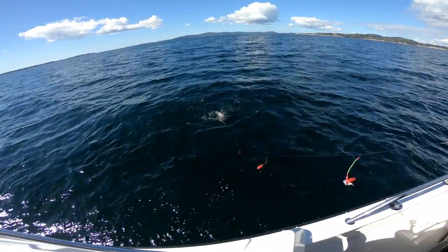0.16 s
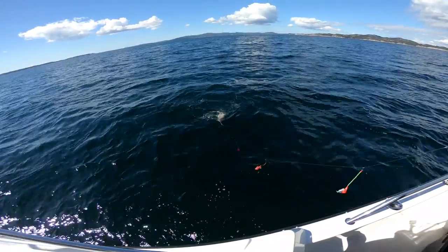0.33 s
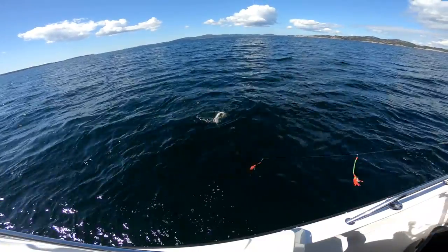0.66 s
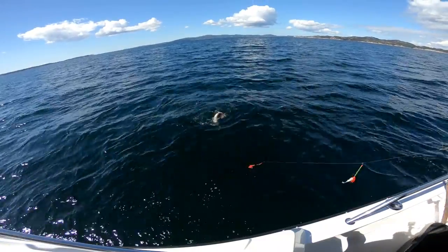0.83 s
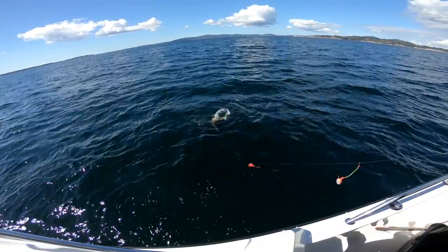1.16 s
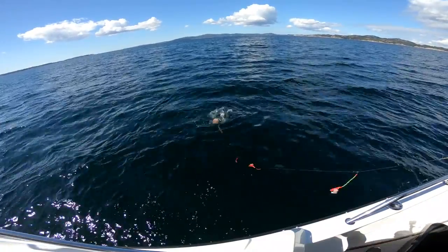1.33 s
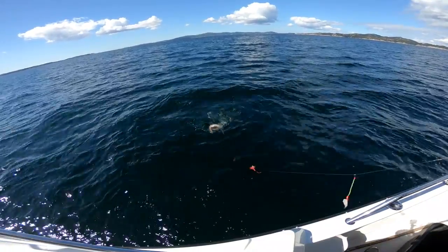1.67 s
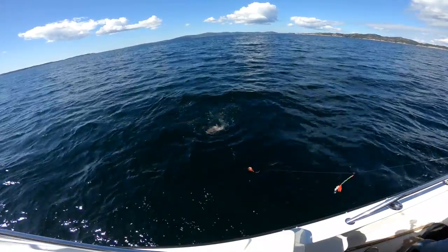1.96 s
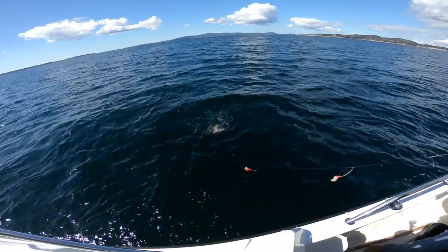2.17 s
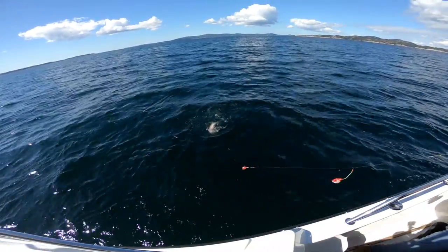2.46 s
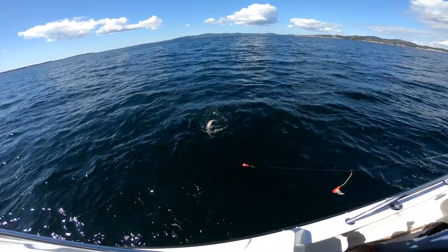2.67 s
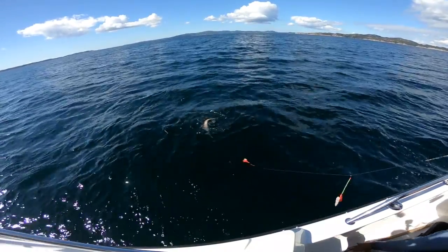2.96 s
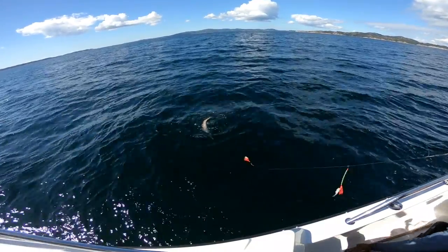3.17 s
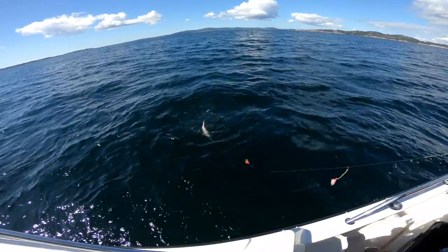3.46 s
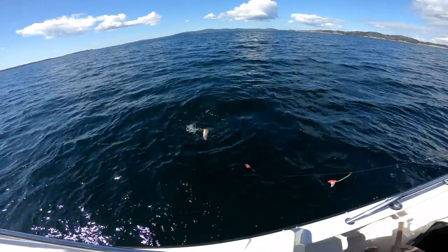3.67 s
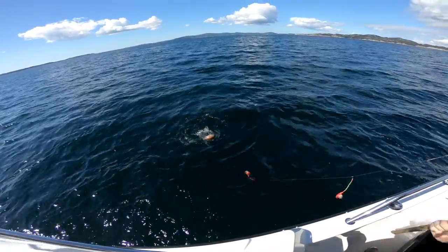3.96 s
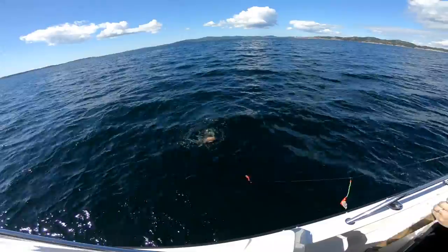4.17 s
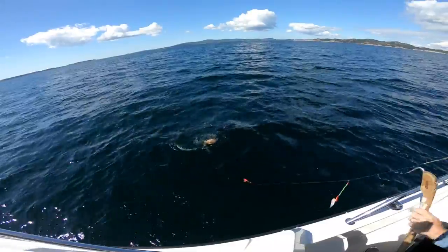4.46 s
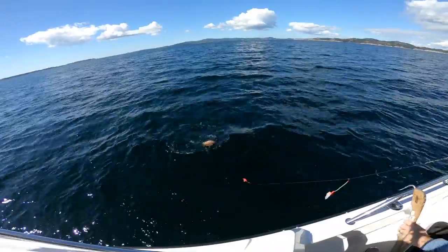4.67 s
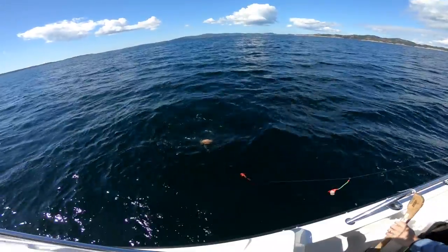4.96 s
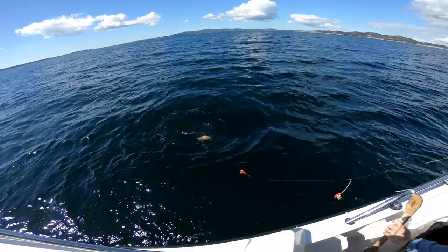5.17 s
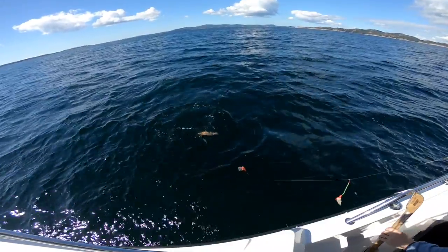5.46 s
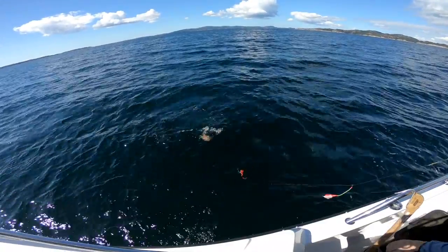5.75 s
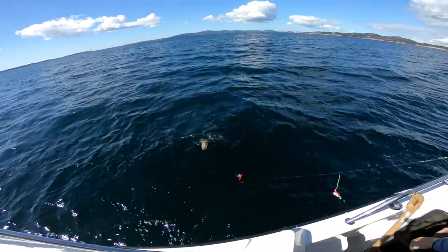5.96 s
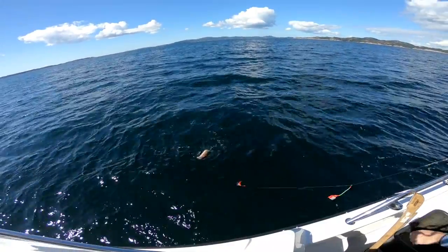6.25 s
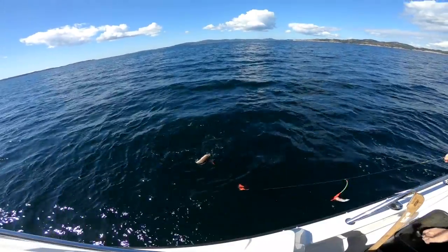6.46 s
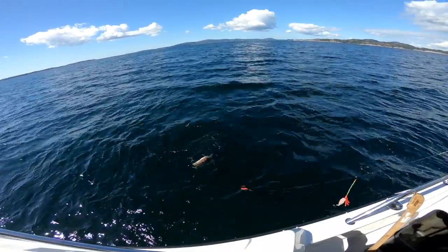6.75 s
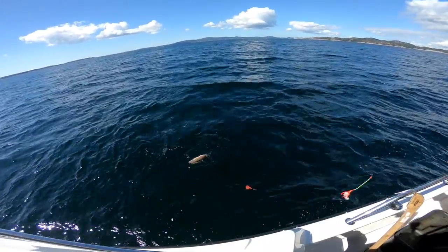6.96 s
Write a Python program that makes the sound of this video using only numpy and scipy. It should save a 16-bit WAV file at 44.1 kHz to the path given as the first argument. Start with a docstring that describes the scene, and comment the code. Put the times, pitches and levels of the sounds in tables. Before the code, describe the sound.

Close beside a small boat, water smacks the hull hard, calms to gurgle and droplets, then slaps again with a brief metallic rattle.

```python
"""At the side of a small open boat, a camera microphone close by hears small waves slap the hull.
Slaps crowd the first 1.8 s: noise bursts that crack and spray, with booms of ringing hull modes
and an early rattle of a metal fitting. A lull follows: rising-sine gurgle and trickle, two swishes,
single drops, a few slaps. From 4.7 s more slaps shake the fitting; gurgle and a last slap close.
Throughout lie a steady noise hush and deep noise, slow air pressure swaying the microphone."""
import sys
import numpy as np
from scipy import signal
from scipy.fft import rfft, irfft
from scipy.io import wavfile
from scipy.ndimage import uniform_filter1d

SR = 44100
rng = np.random.default_rng(int(sys.argv[2]) if len(sys.argv) > 2 else 0)


def unload_wav(signal):
    """Save mono or channel-first audio to the path in sys.argv[1] as 16-bit WAV at rate SR, clipped to [-1, 1]."""
    wavfile.write(
        sys.argv[1],
        SR,
        np.round(np.clip(np.atleast_2d(signal).T, -1, 1) * 32767).astype(np.int16),
    )


def amplitude_ratio(level_db):
    """Convert a level in decibels to the matching linear amplitude (field) ratio."""
    exponent = np.asarray(level_db, float) / 20
    return 10 ** exponent


N = 313551
T = np.arange(N) / SR

# Slaps and splashes at the hull; the slap colour is built from the three levels.
# Each row: time in seconds, crack level in dB, body level in dB, spray level in dB, length factor.
SLAP_EVENTS = [(0.0705, -21, -8.5, -20, 0.44), (0.3328, -28, -5.5, -29, 2.5),
               (0.3369, 3.5, -22, -10.5, 1.47), (0.3653, -69, -11.5, -8.5, 2.5),
               (0.468, -28, -8, -38, 1.05), (0.6997, -14, -16, -46, 0.84), (0.74, -32, 4.5, -39, 0.77),
               (0.7605, -8.5, -2, -41, 0.58), (0.825, -57, -1.5, -41, 0.89), (0.9306, -18, -9.5, -43, 0.23),
               (0.9894, -20, 0, -24, 0.48), (0.995, 7, -0.5, 2, 0.66), (1.0188, -10.5, -7.5, -15.5, 1.37),
               (1.249, -3, -19, -20, 0.78), (1.279, 3.5, 6, -15, 0.98), (1.4438, 7, -34, -51, 0.62),
               (1.467, -13.5, -8, -32, 0.69), (1.502, -1, -4, -40, 1.28), (1.573, 0.5, -5.5, -23, 1.2),
               (1.6117, 0, -38, -39, 0.64), (1.645, -5, -1.5, -72, 0.82), (1.6934, -14, -7, -54, 0.55),
               (1.7404, -80, -13, -48, 0.85), (2.371, -64, -20, -55, 0.86), (2.418, -60, -22, -57, 1.5),
               (2.4866, -24.5, -43, -37, 0.72), (2.938, -37, -27, -39, 3), (3.0893, 5, -50, -19, 1.66),
               (3.105, -8, -12.5, -49, 1.32), (3.1527, -17, -31, -68, 1.37), (3.545, -2, 3.5, -72, 0.67),
               (3.581, -22, -32, -31, 2.8), (4.7283, -1.5, -5, -4.5, 1.08), (4.9067, -30, -29, -39, 1.1),
               (5.015, -2, -10, -10.5, 1.46), (5.3284, -10, -21.5, -29, 0.99),
               (5.5544, -12, -26, -22.5, 0.79), (6.905, -26, -13.5, -33, 2)]
# Fade of a slap of length factor 1. Each row: frequency in Hz, time to fall 60 dB in seconds.
SLAP_FADE = [(200, 0.29), (500, 0.12), (1200, 0.1), (3000, 0.054), (8000, 0.053), (14000, 0.0083)]
# Onset of a slap. Each row: frequency in Hz, rise time constant in seconds.
SLAP_ONSET = [(200, 0.016), (1000, 0.00058), (8000, 0.00031)]
# Thrown water falls back after each slap: a fainter tail, this many times longer.
FALLBACK_DB, FALLBACK_SLOWER = -26, 3.23

# Blows that make the hollow hull boom.
# Each row: start in seconds, level in dB, level of the deepest mode within the blow in dB.
HULL_BLOWS = [(0.246, -22, -9), (0.347, -2.5, 3), (0.749, -6.5, 14), (1.003, -7, -22), (1.288, -11, -3),
              (1.508, -10.5, -4), (1.649, -15.5, -7), (2.417, -23.5, 6), (2.96, -23, 0), (3.101, -21.5, 5),
              (3.547, -8, 3), (3.809, -26, 14.5), (4.733, -8, 4), (4.907, -20.5, -10), (5.021, -11.5, -9),
              (5.063, -13.5, -10), (5.338, -14, -1), (6.618, -27, 1), (7.027, -14, 5)]
# Low modes of the hull. Each row: frequency in Hz, level in dB, time to fall 60 dB in seconds.
HULL_MODES = [(59.3, -8.5, 0.43), (68.6, -12, 0.49), (107.25, 1, 0.27), (119.4, 2, 0.32), (147.4, 0, 0.22),
              (287, 5, 0.069)]
# Water working at the hull from below, before its two parts are weighted.
# Each row: time in seconds, level in dB.
SLOSH_LEVEL = [(0.0, -34.5), (0.87, -23), (1.68, -33.5), (1.86, -47.5), (4.79, -43.5), (4.95, -28.5),
               (6.06, -43), (6.95, -32.5), (7.11, -24)]

# Blows that shake the metal fitting. Each row: start in seconds, level in dB.
FITTING_BLOWS = [(0.3403, -14), (0.369, -15), (0.3958, -20), (2.211, -34), (4.73, -9.5), (5.016, -11),
                 (5.3252, -35)]
# Modes of the fitting. Each row: frequency in Hz, level in dB, time to fall 60 dB in seconds.
FITTING_MODES = [(1600, 0, 0.03), (2170, -5, .03), (3000, -3, .035), (3380, -1, 0.03), (4050, -2, .03),
                 (4880, -2, 0.03), (6560, -10, 0.2), (6750, -9, 0.06), (6900, -8, .05), (7010, -6, .06)]

# Gurgle along the waterline, before its swelling. Each row: time in seconds, level in dB.
GURGLE_LEVEL = [(0, -36.5), (.3, -38.5), (.88, -24.5), (1.4, -40), (1.7, -18.5), (1.86, -59), (1.99, -41),
                (2.33, -51), (2.43, -36.5), (2.66, -38.5), (2.88, -55.5), (3.07, -33), (3.52, -46),
                (3.77, -36.5), (3.9, -42), (4.2, -42.5), (4.31, -37), (4.45, -54.5), (4.7, -46),
                (4.99, -38.5), (5.45, -41), (5.7, -33.5), (5.95, -48), (6.07, -35.5), (6.19, -44.5),
                (6.28, -32.5), (6.36, -38), (6.43, -34.5), (6.63, -30.5), (6.82, -33.5), (6.95, -22),
                (7.11, -29)]
WAVES_DB = 2.2  # slow swelling of the gurgle, per unit of its random curve
PLOPS_DB = -5.5  # sparser, longer-ringing plops, against the dense gurgle

# Showers of droplets running off, before clumping and echo.
# Each row: start in seconds, length in seconds, trickle level in dB, fizz level in dB.
SHOWER_EVENTS = [(0, 0.25, -43, -45.5), (1.046, 0.28, -47, -51.5), (1.927, 0.22, -51.5, -59),
                 (2.613, 0.05, -48, -54), (3.034, 0.04, -60, -46.5), (3.65, 0.088, -39.5, -44),
                 (3.767, 0.068, -47, -49.5), (3.909, .17, -45.5, -49.5), (4.89, 0.12, -59, -69),
                 (5.04, 0.038, -51, -47), (5.58, 0.17, -47.5, -51), (5.832, 0.037, -52.5, -55),
                 (6.04, 0.071, -58.5, -78), (6.356, 0.042, -61, -52), (6.538, 0.18, -49, -49),
                 (6.855, 0.13, -42, -43.5)]
SHOWER_RISE_S, SHOWER_FADE_DB_PER_S = 0.031, 137
DRIZZLE_DB = -63, -68  # trickle and fizz that never stop
STRAYS_PER_S, STRAYS_DB = 47, -7  # stray drops within a shower, level against its fizz
# The loudest single drops, before the echo. Each row: start in seconds, onset level in dB.
DROPS = [(2.1155, -26), (3.696, -21), (3.7956, -19), (4.039, -26), (4.114, -40), (4.1606, -30),
         (4.1924, -29), (4.265, -28), (4.4233, -31), (4.449, -30), (5.7184, -36), (5.839, -24),
         (5.8616, -40), (6.5535, -23), (6.5785, -33), (6.7473, -25.5)]
ECHO_DELAY_S, ECHO_STRENGTH = 0.00041, 0.5  # the hull side mirrors droplets

# Large bubbles that blip. Each row: start in seconds, level in dB, nominal frequency in Hz.
BLIPS = [(3.67, -21, 480), (3.819, -27, 830), (4.865, -28, 810), (5.752, -28.5, 610), (6.258, -26.5, 258)]
# Squeaky swishes. Each row: start in seconds, length in seconds, level at the top of the arch in dB,
# edge frequency in Hz, top frequency in Hz.
SWISH_EVENTS = [(2.632, .04, -42, 4700, 5200), (2.676, .036, -34, 4500, 5900)]

# Slow pressure on the microphone. Each row: time in seconds, level in dB.
SWAY_LEVEL = [(0.0, -29), (0.36, -15.5), (1.13, -11), (1.6, -21), (3, -19), (4.2, -19.5), (6.71, -25),
              (7.11, -9)]
# Spectrum of that pressure. Each row: frequency in Hz, relative level in dB.
SWAY_SPECTRUM = [(.5, -38), (2.5, 2.5), (8, -3.0), (20, -43.0), (45, -65), (90, -74.0)]
# Spectrum of the steady hush. Each row: frequency in Hz, relative level in dB.
HUSH_SPECTRUM = [(15, -3.5), (25, -1.5), (59, -29), (184, -18), (291, -19.5), (400, -27), (1180, -44),
                 (8960, -49), (15800, -54.5)]
HUSH_DB = -35.5
# Treble loss of the microphone housing. Each row: frequency in Hz, gain in dB.
HOUSING = [(4000, -2.5), (9000, -5), (13000, -7.5), (16000, -9)]


def evened(x):
    """Brings a sound to an rms of 1."""
    return x / np.sqrt(np.mean(x ** 2) + 1e-20)


def read(points, hz):
    """Reads a table of frequency points on a log frequency scale."""
    f, value = np.transpose(points)
    return np.interp(np.log(hz + 1), np.log(f + 1), value)


def level_over_time(points):
    """Joins time and level points by straight lines, in dB."""
    return np.interp(T, *np.transpose(points))


def add(mix, s, sound):
    """Lays a sound into the mix from second s."""
    part = mix[round(s * SR):][:len(sound)]
    part += sound[:len(part)]


def band(x, lo_hz, hi_hz):
    """Keeps one frequency band."""
    edges = [lo_hz, min(hi_hz, .49 * SR)]
    return signal.sosfilt(signal.butter(2, edges, "band", fs=SR, output="sos"), x)


def drift(size):
    """A smooth random curve of rms 1: noise averaged twice over size samples."""
    once = uniform_filter1d(rng.standard_normal(N), size=size)
    return evened(uniform_filter1d(once, size=size))


def ring(modes, seconds):
    """One dying sine a mode."""
    t = np.arange(round(seconds * SR)) / SR
    return [amplitude_ratio(db - 60 * t / t60) * np.sin(2 * np.pi * hz * t) for hz, db, t60 in modes]


def grains(lo_hz, hi_hz, cycles, per_s, spread_db, glide, tilt_db=0, count=16):
    """Short sines, rising where glide is set; a sparse random train sets off each size."""
    strength = amplitude_ratio(spread_db * np.minimum(rng.exponential(1, N), 5))
    strength = strength * (rng.random(N) < per_s / SR)
    kind, out = rng.integers(0, count, N), np.zeros(N)
    for k, hz in enumerate(np.geomspace(lo_hz, hi_hz, count)):
        turns = np.arange(round(4 * cycles * SR / hz)) * hz / SR
        swell = turns * np.exp(-2 * turns / cycles)
        bubble = swell * np.sin(2 * np.pi * turns * (1 + glide * turns / cycles))
        bubble = evened(bubble) / np.sqrt(len(bubble))  # equal energy at every size
        out += signal.oaconvolve(strength * (kind == k), amplitude_ratio(tilt_db * k / count) * bubble)[:N]
    return evened(out)


def coloured(points):
    """Steady noise with a given spectrum."""
    spectrum = rfft(rng.standard_normal(N))
    return evened(irfft(spectrum * amplitude_ratio(read(points, np.fft.rfftfreq(N, 1 / SR))), N))


def slaps():
    """A burst of droplets in every band: treble rises and dies fast, the body slowly."""
    flutter = evened(uniform_filter1d(rng.standard_normal(N), 60))
    droplets = rng.standard_normal(N) * amplitude_ratio(3.77 * flutter)
    t, out = np.arange(SR // 2) / SR, np.zeros(N)
    edges = np.geomspace(170, 16000, num=16)
    for lo, hi in zip(edges, edges[1:]):
        hz, power = np.sqrt(lo * hi), np.zeros(N)
        for s, crack_db, body_db, spray_db, length in SLAP_EVENTS:
            colour = [(200, body_db - 7.5), (600, body_db), (1200, (body_db + crack_db) / 2 - 5.5),
                      (2500, crack_db - 8.0), (6000, spray_db), (10000, spray_db - 10.0),
                      (14000, spray_db - 36)]
            rise = 1 - np.exp(-t / read(SLAP_ONSET, hz))
            fade_db = -60 * t / (length * read(SLAP_FADE, hz))
            fallback = amplitude_ratio(FALLBACK_DB + fade_db / FALLBACK_SLOWER)
            shape = rise * (amplitude_ratio(fade_db) + fallback)
            add(power, s - .001, amplitude_ratio(2 * read(colour, hz)) * shape ** 2)  # powers add up
        out += np.sqrt(power) * evened(band(droplets, lo, hi))
    return out


def hull():
    """Pushes of water, and a slosh of changing level, set the low modes of the hull ringing."""
    out, modes = np.zeros(N), ring(HULL_MODES, .8)
    swell = 1 - np.exp(-np.arange(len(modes[0])) / SR / 0.0099)
    for s, db, deep_db in HULL_BLOWS:
        add(out, s, amplitude_ratio(db) * swell * (amplitude_ratio(deep_db) * modes[0] + sum(modes[1:])))
    slosh = grains(43.5, 212.5, 1.1, 210, 1.22, 0.)
    rung = evened(signal.oaconvolve(slosh, sum(modes))[:N])
    return out + amplitude_ratio(level_over_time(SLOSH_LEVEL)) * (0.65 * slosh + 1.25 * rung)


def fitting():
    """A brief rattle drives the same metal modes at each blow, each blow in its own balance."""
    out, modes = np.zeros(N), np.array(ring(FITTING_MODES, .3))
    rattles = rng.standard_normal((len(FITTING_BLOWS), len(FITTING_MODES), 800))
    rattles = rattles * amplitude_ratio(-60 * np.arange(800) / SR / 0.027)  # falls 60 dB in 27 ms
    for (s, db), rattle in zip(FITTING_BLOWS, rattles):
        rattle = rattle / np.linalg.norm(rattle[0])
        add(out, s, amplitude_ratio(db) * signal.fftconvolve(modes, rattle, axes=1).sum(axis=0))
    return out


def gurgle():
    """Dense rising bubble sines in surges, among them sparser, longer-ringing plops; all swell slowly."""
    surges = np.clip(drift(300), -2, 2)
    waves_db = WAVES_DB * np.clip(drift(2500), -2, 2)
    dense = grains(252.2, 2028, 3.8, 1800, 2.85, 0.027, tilt_db=-21)
    plops = grains(350, 1300, 6, 200, 2.8, 0.06, tilt_db=-7)
    level = amplitude_ratio(level_over_time(GURGLE_LEVEL) + waves_db)
    return level * (amplitude_ratio(1.9 * surges) * dense + amplitude_ratio(PLOPS_DB + waves_db) * plops)


def showers():
    """Each shower swells in, holds and fades: the gains of trickle and fizz."""
    gains = amplitude_ratio(DRIZZLE_DB)[:, None] * np.ones(N)
    for start, length, *db in SHOWER_EVENTS:
        rise = np.clip((T - start) / SHOWER_RISE_S, 0, 1)
        fade_db = SHOWER_FADE_DB_PER_S * np.maximum(T - start - length, 0)
        gains = gains + amplitude_ratio(db)[:, None] * rise * amplitude_ratio(-fade_db)
    return gains


def single_drops():
    """Each drop is a dying sine click, pitched at random from 4.5 to 7 kHz."""
    out, t = np.zeros(N), np.arange(300) / SR
    for (s, db), u in zip(DROPS, rng.random((len(DROPS), 1))):
        add(out, s, amplitude_ratio(db - 60 * t / 0.0028) * np.sin(2 * np.pi * (4500 + 2500 * u) * t))
    return out


def mirrored(x):
    """An echo off the hull side, a hand's width later, puts a comb on the sound."""
    hz = np.fft.rfftfreq(N, 1 / SR)
    return irfft(rfft(x) * (1 + ECHO_STRENGTH * np.exp(-2j * np.pi * hz * ECHO_DELAY_S)), N)


def droplets_running_off():
    """Short bubble sines trickle and fizz in clumps, with stray and single drops, near the hull side."""
    clumps = np.clip(drift(300), -2, 2)
    trickle = grains(1504, 3530, 4.1, 2200, 4.8, 0.02, tilt_db=-12.5)
    fizz = grains(3220, 13800, 5.8, 5000, 2.2, 0.014, tilt_db=-7)
    strays = grains(3000, 9000, 1.2, STRAYS_PER_S, 2.4, 0.)
    trickle_gain, fizz_gain = showers()
    trickling = trickle_gain * amplitude_ratio(2.9 * clumps) * trickle
    fizzing = fizz_gain * (amplitude_ratio(4.5 * clumps) * fizz + amplitude_ratio(STRAYS_DB) * strays)
    return mirrored(trickling + fizzing + single_drops())


def bubbles():
    """A pocket of air rings unevenly and rises a little in pitch as it nears the surface."""
    out, wobble = np.zeros(N), evened(uniform_filter1d(rng.standard_normal(N), size=200))
    for s, db, hz in BLIPS:
        turns = np.arange(round(40 * SR / hz)) * hz / SR
        shape = turns / 4 * np.exp(1 - turns / 4)
        add(out, s, amplitude_ratio(db) * shape * np.sin(2 * np.pi * turns * (.95 + 0.0046 * turns)))
    return out * (1 + 0.63 * wobble)


def swish():
    """Slow noise on a gliding sine makes a narrow hiss; level and pitch follow one arch."""
    out = np.zeros(N)
    for start, length, db, edge_hz, top_hz in SWISH_EVENTS:
        arch = np.sin(np.pi * np.arange(0, length, 1 / SR) / length)
        phase = 2 * np.pi * np.cumsum(edge_hz + (top_hz - edge_hz) * arch) / SR
        add(out, start, amplitude_ratio(db) * arch * np.sin(phase))
    return out * drift(50)


def sway():
    """Slow air pressure on the microphone: noise strongest at a few Hz, its level moving."""
    return amplitude_ratio(level_over_time(SWAY_LEVEL)) * coloured(SWAY_SPECTRUM)


def hush():
    """Steady noise, strongest in the bass, lies behind everything."""
    return amplitude_ratio(HUSH_DB) * coloured(HUSH_SPECTRUM)


def scene():
    """Sums the hull sounds, the water sounds, the pressure sway and the hush into one channel."""
    at_the_hull = slaps() + hull() + fitting()
    in_the_water = gurgle() + droplets_running_off() + bubbles() + swish()
    return (at_the_hull + in_the_water + sway() + hush())[None]


def low_pass(x):
    """Removes everything above the highest recorded frequency."""
    return signal.sosfilt(signal.butter(12, 15930, fs=SR, output="sos"), x)


def record(dry):
    """The housing dulls the treble; the loudest slaps reach the top of the range and are rounded off."""
    hz = np.linspace(0, SR / 2, num=257)
    housing = signal.firwin2(255, hz, amplitude_ratio(read(HOUSING, hz)), fs=SR)
    dulled = signal.oaconvolve(dry, housing[None], "same")
    rounded_off = np.tanh(1.13 * dulled) / 0.99
    return low_pass(rounded_off)


dry = scene()
out = record(dry)
unload_wav(out)
```